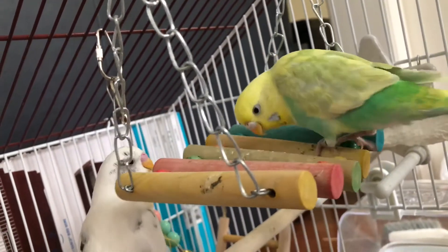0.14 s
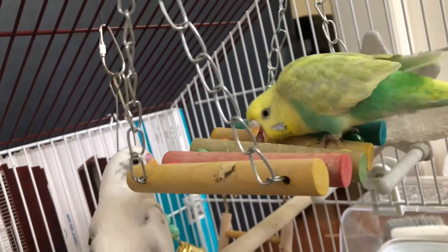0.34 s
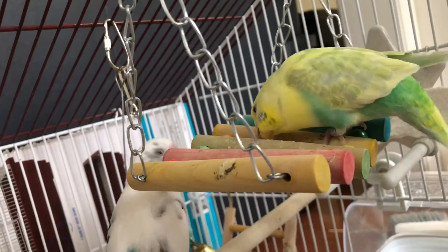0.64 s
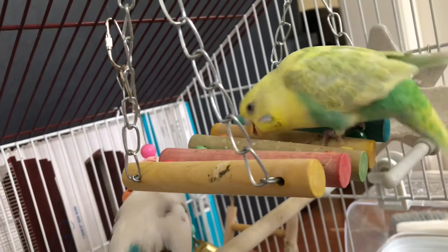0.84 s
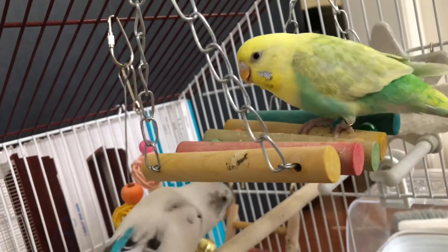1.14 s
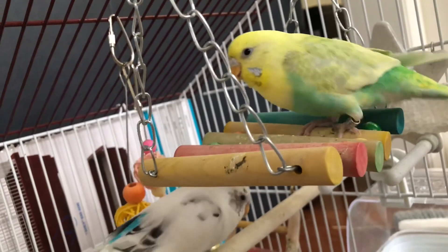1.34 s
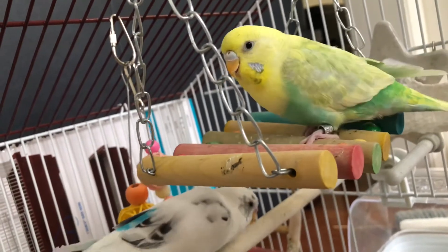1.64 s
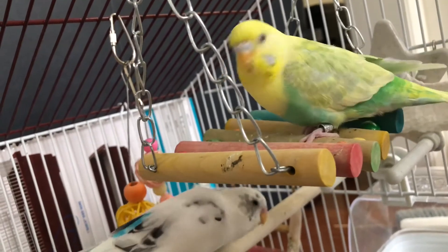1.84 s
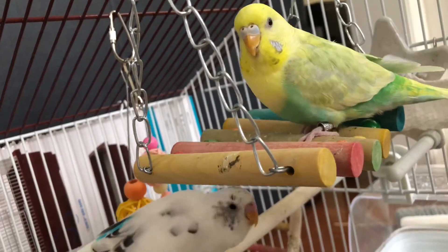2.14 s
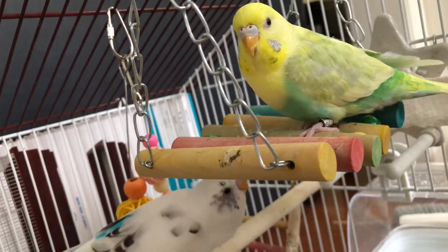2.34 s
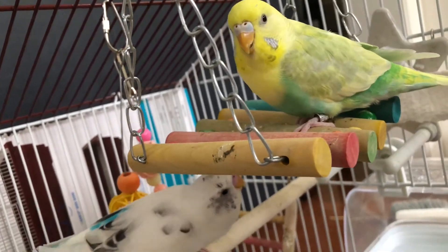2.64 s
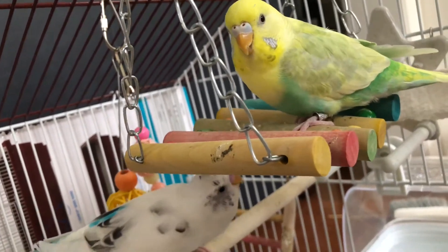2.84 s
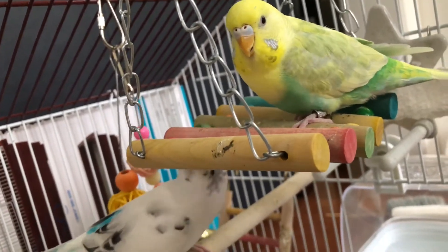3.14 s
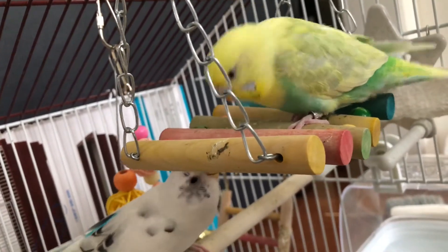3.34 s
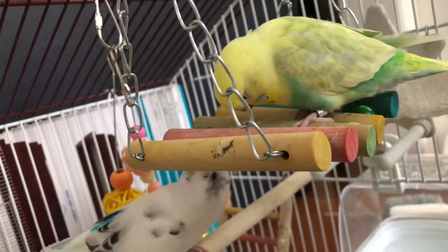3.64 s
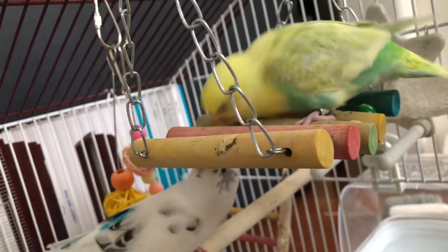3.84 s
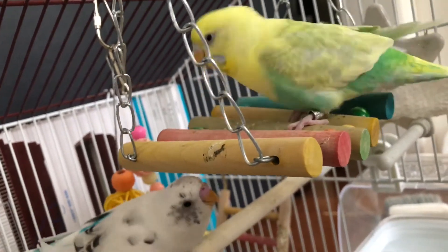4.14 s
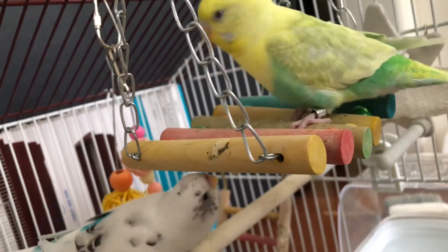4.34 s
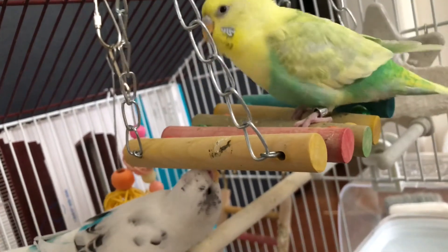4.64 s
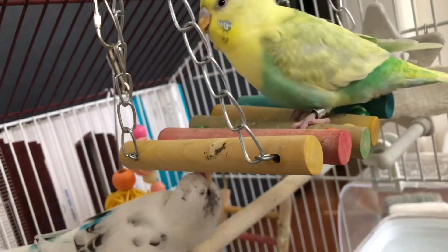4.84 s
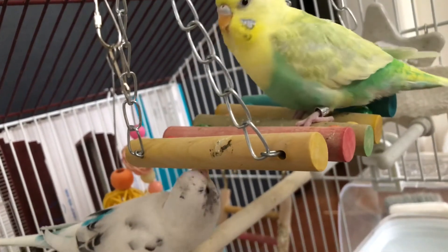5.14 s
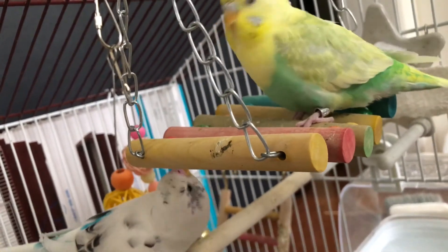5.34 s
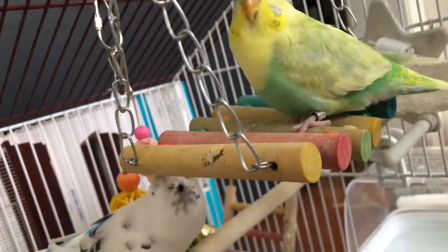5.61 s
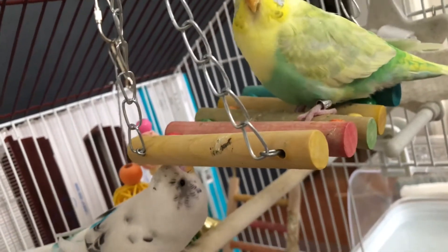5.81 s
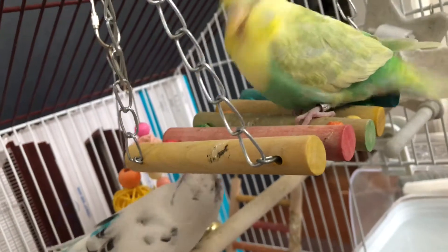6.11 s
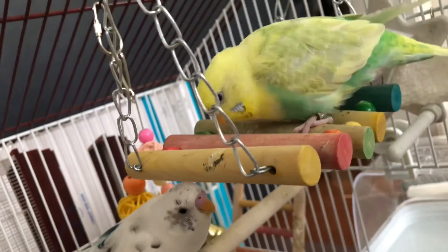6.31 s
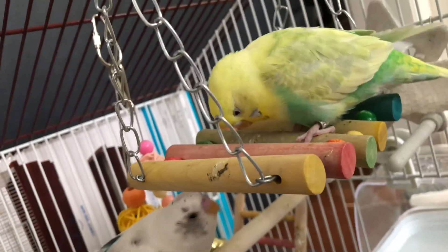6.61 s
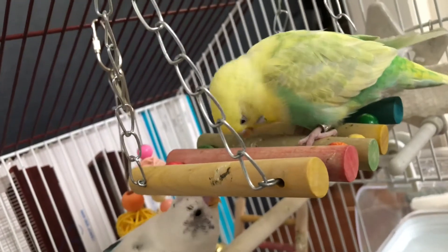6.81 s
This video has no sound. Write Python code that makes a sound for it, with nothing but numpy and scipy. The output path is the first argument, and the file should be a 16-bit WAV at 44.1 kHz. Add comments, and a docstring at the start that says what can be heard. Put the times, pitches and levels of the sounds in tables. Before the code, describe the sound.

Close up in a wire cage indoors, a budgie shifts on its perch, stirring a metal chain with faint ticks. Cage knocks and bright link clinks follow, then crisp beak snaps on wood and a small ringing ping. Later come a denser chain rattle, two louder snaps, short chirps with a weak rasp between them, a soft thud, dull taps and another chain stir. Very quiet room tone and low hum lie beneath.

```python
"""In a wire cage, heard up close, a budgie nibbles at a wooden toy hanging on a chain.
Beak contacts, chain slips, cage knocks and dull taps are noise or clicks into resonances; one link pings as sines.
Moves of the bird rub and scratch the perch and stir the chain; one thud is low noise.
Two short chirps with a weak rasp between them are harmonic whistles with rasping noise.
The room adds a brief decaying-noise ring; coloured noise and a faint low hum lie beneath."""
import sys
import numpy as np
from scipy import signal
from scipy.fft import rfft, irfft
from scipy.io import wavfile

SR = 44100
rng = np.random.default_rng(int(sys.argv[2]) if len(sys.argv) > 2 else 0)


def waveform_to_disk(signal):
    """Save audio, clipped to [-1, 1], as 16-bit WAV at the path in sys.argv[1]."""
    frames = np.transpose(np.atleast_2d(signal))
    scaled = np.clip(frames, -1, 1) * 32767
    samples = np.round(scaled).astype(np.int16)
    wavfile.write(sys.argv[1], SR, samples)


N = 307377
TIME = np.arange(N) / SR


def from_db(db):
    """Decibels to gain."""
    return 10 ** (np.asarray(db) / 20)


def rms_one(x):
    """Scale to unit power."""
    return x / np.sqrt(np.mean(x ** 2) + 1e-20)


def at_hz(points, hz):
    """Read a table on a log-frequency axis."""
    f, value = np.transpose(points)
    return np.interp(np.log(hz + 1e-9), np.log(f), value)


def add(out, s, sound):
    """Mix a short sound in at a given time."""
    i = max(0, round(s * SR))
    out[i:i + len(sound)] += sound[:max(0, N - i)]


def noise(spectrum):
    """Steady noise of a given colour, rms 1."""
    hz = np.arange(N // 2 + 1) * SR / N
    white = rfft(rng.standard_normal(N))
    return rms_one(irfft(white * from_db(at_hz(spectrum, hz)), N))


def cut(x, hz, kind, order=2):
    """Butterworth low- or high-pass."""
    sos = signal.butter(order, hz, kind, fs=SR, output="sos")
    return signal.sosfilt(sos, x + 1e-18)  # offset avoids denormals


def resonate(x, modes):
    """Parallel two-pole resonances with alternating signs."""
    out = 0
    for k, (hz, width_hz, db) in enumerate(modes):
        r = np.exp(-np.pi * width_hz / SR)
        poles = [1, -2 * r * np.cos(2 * np.pi * hz / SR), r * r]
        gain = (-1) ** k * from_db(db) * (1 - r * r) / 2
        out = out + gain * signal.lfilter([1, 0, -1], poles, x + 1e-18)
    return out


def dying(s, decay_s):
    """Envelope that starts at a given time and falls exponentially."""
    return (TIME >= s) * np.exp(-np.clip((TIME - s) / decay_s, 0, 50))


def swell(s, rise_s, settle_s):
    """Effort that builds up to 1 at a given time and then settles."""
    distance = np.maximum((s - TIME) / rise_s, (TIME - s) / settle_s)
    return np.exp(-np.minimum(distance, 50))


# single pecks: t/s, snap level/dB, woody body/dB re snap, bright edge/dB re snap
PECK_ROWS = [(.1773, -58.5, -0.5, 3.5), (1.7659, -58, 11.5, 10), (1.854, -72.5, 11, 14),
             (1.8644, -67.5, 12.5, 12.5), (2.2283, -57, -2, 6), (2.961, -55.5, 1.5, 6),
             (3.0859, -58, -6, -16), (3.661, -60.5, 3.5, -3), (3.7839, -46, -5.5, -8),
             (3.9579, -32.5, -10, -22), (4.2992, -36.5, -17, 1), (4.7972, -61, -6, -4.5),
             (4.9538, -42, -10, 0), (5.1675, -59.5, -0.5, -5), (5.6534, -66, 0, 9.5),
             (5.9682, -51, -7, -13), (6.8261, -57, 11.5, -23.5)]
# full bites: snap t/s, snap level/dB, woody body/dB re snap, bright edge/dB re snap,
# touch lead/s, touch/dB re snap, touch edge/dB re touch, release lag/s
BITE_ROWS = [(2.0579, -35.5, -10, 7, 0.018, -16.5, 3, 0.01), (2.7312, -40, -2, 4.5, 0.0098, -19, 12, 0.011),
             (3.2526, -35.5, -8.5, -3.5, .0119, -8.5, 4, 0.0064),
             (3.3528, -40, 1.5, 5, .0088, -14, -2, .0056)]
TOUCH_BODY_DB = 11.5  # the light first touch is woodier than the snap
RELEASE_DB, RELEASE_BODY_DB, RELEASE_EDGE_DB = -17, 14, -1  # offsets from the snap's values
NIBBLES_PER_S, NIBBLE_DB = 1.2, -66


def beak_contacts():
    """Pecks, three contacts per bite, random nibbles: rows (s, snap dB, body dB, edge dB)."""
    rows = list(PECK_ROWS)
    for s, snap_db, body_db, edge_db, before_s, touch_db, touch_edge_db, after_s in BITE_ROWS:
        rows += [
            (s - before_s, snap_db + touch_db, body_db + TOUCH_BODY_DB, touch_edge_db),
            (s, snap_db, body_db, edge_db),
            (s + after_s, snap_db + RELEASE_DB, body_db + RELEASE_BODY_DB, edge_db + RELEASE_EDGE_DB),
        ]
    nibble_s = TIME[rng.random(N) < NIBBLES_PER_S / SR]
    return rows + [(s, NIBBLE_DB, 0, 0) for s in nibble_s]


# click resonances, low to high: f/Hz, width/Hz, level/dB
CLICK_BODY = [(1550, 570, 0.5), (2300, 380, 4.5), (2870, 830, -0.5)]
CLICK_SNAP = [(4240, 1000, -0.48), (6730, 2200, -0.52)]
CLICK_EDGE = [(10880, 2300, 1.3), (14700, 4000, -2.5)]


def beak(crumble_db=-23, crumble_s=0.0029, body_lag_s=0.00023):
    """Each contact is a sharp snap and crumbling fibres; low bending waves arrive a little late."""
    out, t = np.zeros(N), TIME[:SR // 20]
    for s, snap_db, body_db, edge_db in beak_contacts():
        force = from_db(crumble_db) * rng.standard_normal(len(t)) * np.exp(-t / crumble_s)
        force[0] = 1
        for modes, db, lag_s in [(CLICK_BODY, body_db, body_lag_s), (CLICK_SNAP, 0, 0), (CLICK_EDGE, edge_db, 0)]:
            part = resonate(force, modes)
            # levels: click energy spread over 1 ms, before the high-pass
            unit = np.sqrt(SR / 1000 / np.sum(part ** 2))
            add(out, s + lag_s, part * from_db(snap_db + db) * unit)
    return cut(out, 1100, "high", order=3)


# chirps: t/s, opening rasp/s, whistle/s, top f/Hz, tone level/dB before trim,
# fade at end/dB, rasp level/dB, croak level/dB before trim
CHIRP_ROWS = [(4.2963, 0.0057, 0.037, 5337, -9, 36, -35, -55.5),
              (4.498, .0115, 0.0137, 3760, -38, 6, -47, -61),
              (4.956, .0063, .0205, 5000, -23, 26.5, -44.5, -38.5)]
# first three harmonics of a full-voiced whistle: level/dB
HARMONIC_DB = [-1, -8.5, -17.5]
# rasp spectrum: f/Hz, relative density/dB per Hz
RASP_SPECTRUM = [(1000, -18.5), (1700, -1.5), (3000, -23.5), (4500, -3), (7000, 5), (11000, -3.5),
                 (16000, -1.5)]
ARCH_TOP, ARCH_OCTAVES = .3, 1.3  # pitch peak, share of whistle; curvature, octaves per squared length
WHISTLE_ATTACK = 0.11  # ramp at each end, share of whistle
TREMOR_HZ, TREMOR_GROWTH = 194, 1  # depth grows after the pitch peak, held at 0.5
RASP_FADE_DB_PER_S = 426  # once the whistle has begun
CROAK_RATIO, CROAK_FALL_OCTAVES = .52, 0.78  # end pitch as share of top pitch; slide


def chirps(jitter=0.0063, jitter_hz=1500, trim_db=-1, full_db=-19, drive_share=0.91):
    """The syrinx starts with a rasp and a low croak, locks into an arched whistle and falls away."""
    out, rasp = np.zeros(N), noise(RASP_SPECTRUM)
    waver, flutter = [rms_one(cut(row, jitter_hz, "low")) for row in rng.standard_normal((2, N))]
    rough_jitter, rough_shimmer = .15, .7
    for s, opening_s, length_s, top_hz, top_db, fade_db, first_rasp_db, croak_db in CHIRP_ROWS:
        on = (TIME >= s) & (TIME <= s + opening_s + length_s)
        t = TIME[on] - s - opening_s  # negative during the opening
        hz, whistle_db = arch(t, length_s, top_hz, top_db, fade_db)
        croak_hz = CROAK_RATIO * top_hz * 2 ** (-CROAK_FALL_OCTAVES * t / opening_s)
        hz = np.where(t < 0, croak_hz, hz)
        whistle_db = np.where(t < 0, croak_db, whistle_db)
        rasp_db = first_rasp_db - RASP_FADE_DB_PER_S * np.maximum(t, 0)
        # a weak whistle is rough in pitch and level, and has few overtones
        rough = from_db(np.minimum(rasp_db - whistle_db, 0))
        pitch_hz = hz * (1 + (jitter + rough_jitter * rough) * waver[on])
        strength = from_db(whistle_db + trim_db) * (1 + rough_shimmer * rough * flutter[on])
        drive = from_db(drive_share * np.minimum(whistle_db - full_db, 0))
        phase = 2 * np.pi * np.cumsum(pitch_hz) / SR
        whistle = sum(from_db(db) * drive ** k * np.sin((k + 1) * phase)
                      for k, db in enumerate(HARMONIC_DB))
        out[on] += strength * whistle + from_db(rasp_db) * rasp[on]
    return out


def arch(t, length_s, top_hz, top_db, fade_db):
    """Pitch and level of a whistle, t seconds in: it swells, arches over, trembles and fades."""
    progress = t / length_s
    hz = top_hz * 2 ** (-ARCH_OCTAVES * (progress - ARCH_TOP) ** 2)
    ramps = np.clip(np.minimum(progress, 1 - progress) / WHISTLE_ATTACK, 1e-3, 1)
    release = np.maximum(progress - WHISTLE_ATTACK, 0) / (1 - WHISTLE_ATTACK)
    depth = np.clip(TREMOR_GROWTH * (progress - ARCH_TOP) / (1 - ARCH_TOP), 0, .5)
    tremor = 1 + depth * np.cos(2 * np.pi * TREMOR_HZ * t)
    return hz, top_db + 20 * np.log10(ramps * tremor) - fade_db * release ** 2


# steps, leans, bobs: t/s of most effort, rise/s, settling/s, foot rub level/dB,
# scratch level/dB, chain slip level/dB before trim
MOVE_ROWS = [(.02, 0.13, 0.13, -63.5, -76, -60), (.38, 0.25, .34, -62.5, -75, -60),
             (1.36, 0.11, 0.6, -67, -80, -69), (3.831, 0.065, 0.19, -54, -68.5, -58),
             (4.54, 0.16, 0.92, -64.5, -86.5, -85.5), (6.11, 0.089, 0.15, -55, -70.5, -54.5),
             (6.9, 0.073, .2, -67, -87.5, -63)]
REST_RUB_DB, REST_SCRATCH_DB = -84, -80.5  # the bird sitting still


def movement(scratch_power=2.06):
    """Each move rubs the perch, and scratches it at the height of the effort: (rub, scratch)."""
    rub, claws = from_db(REST_RUB_DB) ** 2, from_db(REST_SCRATCH_DB) ** 2
    for s, rise_s, settle_s, rub_db, scratch_db, _ in MOVE_ROWS:
        effort = swell(s, rise_s, settle_s)
        rub = rub + (from_db(rub_db) * effort) ** 2
        claws = claws + (from_db(scratch_db) * effort ** scratch_power) ** 2
    return np.sqrt(rub), np.sqrt(claws)


SLIPS_PER_S, SLIP_LEAD_S = 92, 0.0088  # at full effort; the chain stirs just ahead of the feet


def small_slips(spread_db=2.5, effort_db=22):
    """More effort makes slips likelier and louder: rows (s, level dB before trim)."""
    rows = []
    for s, rise_s, settle_s, _, _, slip_db in MOVE_ROWS:
        effort = swell(s - SLIP_LEAD_S, rise_s, settle_s)
        born = rng.random(N) < SLIPS_PER_S * effort / SR
        db = slip_db + effort_db * (effort - 1) + spread_db * rng.standard_normal(N)
        rows += zip(TIME[born], db[born])
    return rows


# loudest link slips: t/s, level/dB before trim, brightness/dB per octave
SLIP_ROWS = [(.18, -52, 0), (0.504, -56, -20), (.565, -57.5, -10), (.6621, -55, 3), (1.3204, -56, 14),
             (1.3693, -43, 9), (1.4121, -42, 3), (1.4488, -52, 10), (1.4685, -45, -3), (3.7503, -42, 1.5),
             (3.774, -40, 1), (3.7884, -39, -6), (3.8075, -38.5, 2), (6.0643, -40, -6), (6.1201, -42.5, -1),
             (6.1268, -44, -3), (6.1359, -43, -2), (6.827, -42.5, -33)]
# chain resonances: f/Hz, width/Hz, level/dB
LINK_MODES = [(5200, 160, 5), (5720, 270, -3.5), (11450, 240, -0.5), (12400, 340, -10.5),
              (8050, 9500, -25.5)]


def chain(slip_s=.0011, trim_db=-11, small_tilt_db=-4):
    """A link slips: a brief scrape swells and dies in the metal's resonances."""
    out, t = np.zeros(N), TIME[:SR // 20]
    slips = SLIP_ROWS + [(s, db, small_tilt_db) for s, db in small_slips()]
    for s, db, tilt_db in slips:
        modes = []
        for hz, width_hz, mode_db in LINK_MODES:
            octaves = np.log2(hz / LINK_MODES[0][0])
            # each point of contact shifts the resonances a little
            modes.append((hz * rng.normal(1, .012), width_hz, mode_db + tilt_db * octaves))
        scrape = rng.standard_normal(len(t)) * t * np.exp(-t / slip_s)
        tick = resonate(scrape, modes)
        add(out, s - slip_s, tick * from_db(db + trim_db) / np.std(tick[:SR // 200]))
    return out


# rub spectrum of claws, feathers, beak and link: f/Hz, relative density/dB per Hz
SCRATCH_SPECTRUM = [(700, -23), (1500, 2), (3000, -3.5), (5000, -0.5), (8000, -4.5), (12000, -9),
                    (16000, -9)]
# struck link: f/Hz, level/dB, t60/s
LINK_RING = [(4400, -59.5, 0.26), (8400, -60, 0.16), (10965, -66, 0.15), (14850, -55, 0.083),
             (15528, -52, 0.093)]
PING_S = 2.209


def ping(contact_db=-63, contact_s=0.022):
    """One link is touched and rings freely as dying sines, with a brief contact noise."""
    ring = 0
    for hz, db, t60_s in LINK_RING:
        envelope = from_db(db) * dying(PING_S, t60_s / np.log(1000))
        ring = ring + envelope * np.sin(2 * np.pi * hz * TIME)
    return ring + from_db(contact_db) * dying(PING_S, contact_s) * noise(SCRATCH_SPECTRUM)


# cage knocks: t/s, level/dB, decay/s, contact cut-off f/Hz, after-hum drive/dB
KNOCK_ROWS = [(0.651, -56.5, 0.062, 895, -55.5), (1.195, -50, 0.047, 6000, -70),
              (1.288, -55.5, 0.076, 150, -52.5)]
# cage resonances: f/Hz, width/Hz, level/dB
CAGE_RING = [(287, 13, 10), (667, 30, 2), (762, 58, -6.5), (950, 70, -8), (1115, 120, -8), (1750, 44, -5),
             (1900, 19, -8), (2280, 140, -7), (2425, 52, -7), (3060, 160, -15), (3900, 500, -26)]


def cage(rub, hum_swell_s=0.0062, hum_decay_s=0.11, rub_share_db=-4, rub_lag_s=0.16):
    """Knocks ring the cage; its lowest mode hums on, phase wandering, after knocks and foot rubs."""
    lowest = CAGE_RING[:1]
    narrow = resonate(resonate(rng.standard_normal(N), lowest), lowest)
    phase = np.angle(signal.hilbert(narrow))
    hum = 0
    for s, *_, hum_db in KNOCK_ROWS:
        hum = hum + from_db(hum_db) * (dying(s, hum_decay_s) - dying(s, hum_swell_s))
    hum = hum + from_db(rub_share_db) * cut(rub, 1 / (2 * np.pi * rub_lag_s), "low", order=1)
    return rattles([knock[:-1] for knock in KNOCK_ROWS], CAGE_RING) + hum * np.cos(phase)


def rattles(blows, modes):
    """Each blow is a dying rattle into the modes of a body; softer contacts sound duller."""
    force = 0
    for s, db, decay_s, hz in blows:
        rattle = cut(rng.standard_normal(N), hz, "low", order=1)
        unit = np.std(resonate(rattle[:SR], modes))
        force = force + from_db(db) * dying(s, decay_s) * rattle / unit
    return cut(resonate(force, modes), 5500, "low")


# dull taps: t/s, level/dB, decay/s, contact cut-off f/Hz
TAP_ROWS = [(4.46, -63.5, 0.34, 3010), (4.772, -57.5, 0.042, 2970), (5.555, -56, 0.05, 3000),
            (5.803, -55.5, 0.068, 3510)]
# tap resonances: f/Hz, width/Hz, level/dB
TAP_RING = [(478, 71, -4), (950, 94, -6), (1335, 104, -6.5), (1800, 105, -3.5), (2460, 310, -14.5),
            (3070, 180, -11), (3550, 94, -13), (3840, 67, -9), (4700, 400, -15.5)]


def taps():
    """Duller blows rattle a body with its own modes."""
    return rattles(TAP_ROWS, TAP_RING)


# wooden perch resonances: f/Hz, width/Hz, level/dB
PERCH_RING = [(172, 60, -9.5), (235.7, 35, -2.5), (302, 40, 2.5), (395, 99, -4), (552.4, 36, 3),
              (790, 140, -9.5), (1132, 140, -10), (1660, 190, -13), (2770, 2600, -23.5)]


def shuffle(strength):
    """Feet rub unevenly on the perch and set its modes ringing."""
    lumps_db = 3 * np.tanh(rms_one(cut(rng.standard_normal(N), 70, "low")))
    rub = rng.standard_normal(N) * from_db(lumps_db)
    return strength * rms_one(cut(resonate(rub, PERCH_RING), 4500, "low"))


# short scrapes of claw or beak: t/s, level/dB, decay/s
DRAG_ROWS = [(0.356, -71, 0.016), (.642, -69, 0.014), (1.198, -63, 0.0092), (1.247, -63, 0.034),
             (1.289, -63, 0.027), (1.328, -60, 0.0074), (3.785, -50.5, 0.012), (3.956, -41.5, 0.011),
             (6.825, -65.5, 0.0085)]


def scratch(claws):
    """Claws, feathers and the dragging beak rub in uneven grains."""
    grains_db = 4.5 * rms_one(cut(rng.standard_normal(N), 140, "low"))
    pressure = claws + sum(from_db(db) * dying(s, decay_s) for s, db, decay_s in DRAG_ROWS)
    return pressure * rms_one(from_db(grains_db) * noise(SCRATCH_SPECTRUM))


# perch thuds: t/s, level/dB, decay/s
THUD_ROWS = [(4.503, -52, 0.033)]


def thuds(body_hz=90, width_hz=110):
    """The bird's weight jolts the perch: dying low resonant noise."""
    body = resonate(rng.standard_normal(N), [(body_hz, width_hz, 0)])
    body = rms_one(cut(body, 4 * body_hz, "low"))
    return body * sum(from_db(db) * dying(s, decay_s) for s, db, decay_s in THUD_ROWS)


# room decay: f/Hz, t60/s
ROOM_DECAY = [(200, 0.99), (2000, 0.76), (5000, 0.54), (10000, 0.18), (16000, 0.15)]


def room(x, tail_db=-19, early_db=-18, early_s=0.02, gap_s=0.00073):
    """Quick reflections from the cage and furniture, then a tail that dies sooner in the treble."""
    t, edges_hz = TIME[:SR], np.geomspace(100, 20000, 9)
    white, hz = rfft(rng.standard_normal(SR)), np.arange(SR // 2 + 1)
    tail = 0
    for lo, hi in zip(edges_hz, edges_hz[1:]):
        band = irfft(white * ((hz >= lo) & (hz < hi)), SR)
        t60_s = at_hz(ROOM_DECAY, np.sqrt(lo * hi))
        tail = tail + band * np.exp(-np.log(1000) * t / t60_s)
    early = rng.standard_normal(SR) * np.exp(-t / early_s)
    response = from_db(tail_db) * rms_one(tail) + from_db(early_db) * rms_one(early)
    response = response * (t > gap_s) / np.sqrt(SR)
    return signal.fftconvolve(x, response)[:N]


# room air spectrum: f/Hz, relative density/dB per Hz
AIR_SPECTRUM = [(15, -42), (25, -6.5), (66, 3), (102, 1.5), (229, -5.5), (560, -10), (840, -13.5),
                (962, -11.5), (1070, -15.5), (1650, -18.5), (2610, -25), (5140, -28.5), (8590, -31.5),
                (14800, -35), (16000, -38.5)]
AIR_DB = -66
HUM_HZ, HUM_DB = 92, -75.5


def background(hum_width_hz=8):
    """Still room air as coloured noise; a distant appliance's wavering hum as narrow-band noise."""
    hum = rms_one(resonate(rng.standard_normal(N), [(HUM_HZ, hum_width_hz, 0)]))
    return from_db(AIR_DB) * noise(AIR_SPECTRUM) + from_db(HUM_DB) * hum


def scene():
    """Bird, toy and cage in the room."""
    rub, claws = movement()
    toy = beak() + chain() + ping()
    bird = chirps() + shuffle(rub) + scratch(claws) + thuds()
    near = toy + bird + cage(rub) + taps()
    return (near + room(near) + background())[None]


CUTOFF_HZ = 15800


def record(dry):
    """The microphone sheds the deepest bass; the top is cut steeply."""
    steep = signal.ellip(10, .1, 70, CUTOFF_HZ, fs=SR, output="sos")
    return signal.sosfilt(steep, cut(dry, 38, "high"))


dry = scene()
out = record(dry)
waveform_to_disk(out)
```